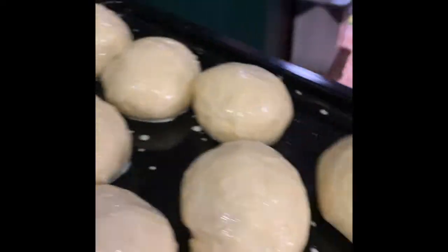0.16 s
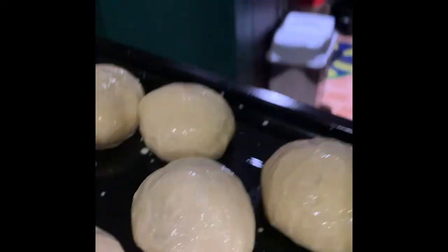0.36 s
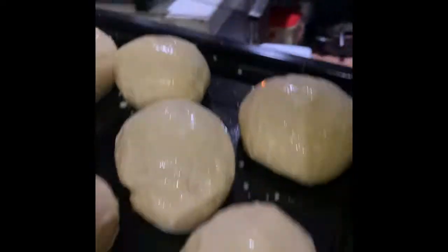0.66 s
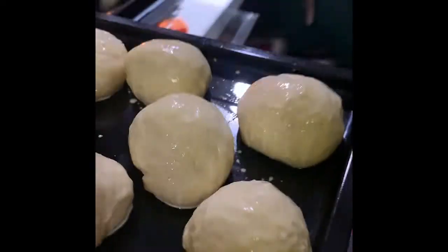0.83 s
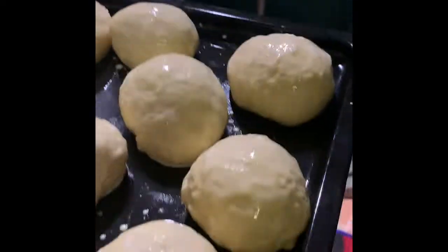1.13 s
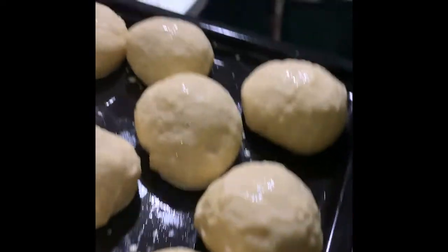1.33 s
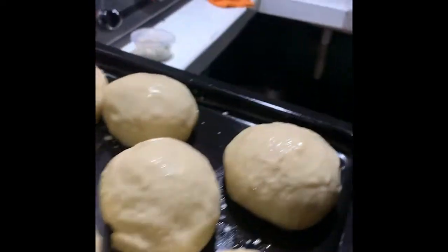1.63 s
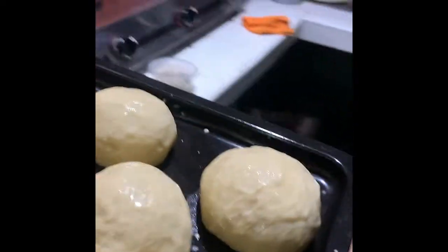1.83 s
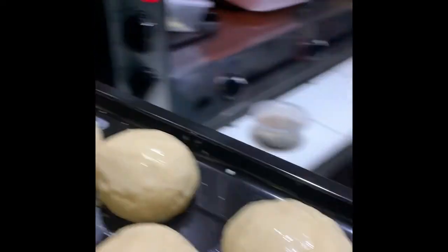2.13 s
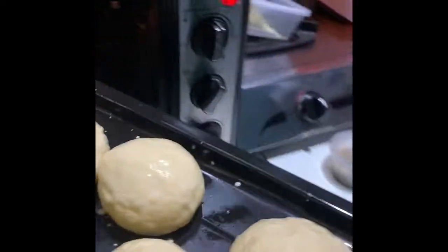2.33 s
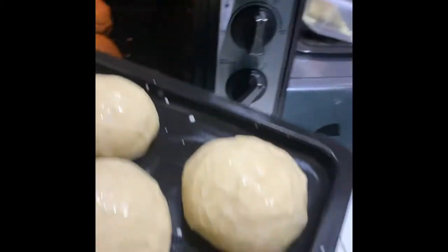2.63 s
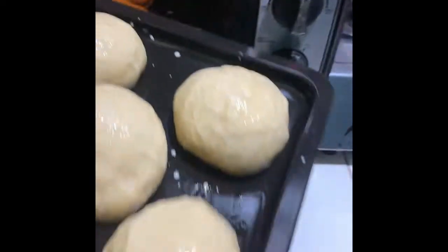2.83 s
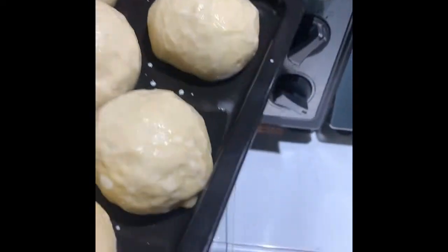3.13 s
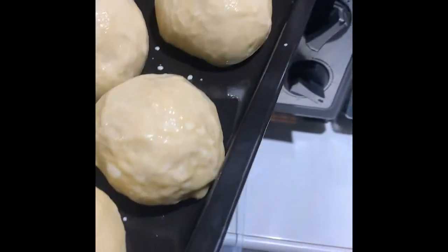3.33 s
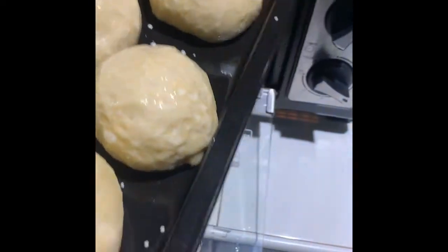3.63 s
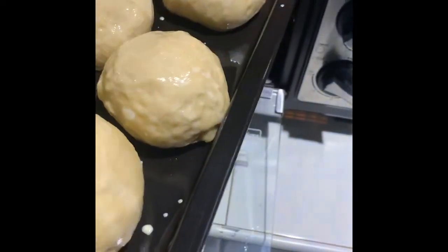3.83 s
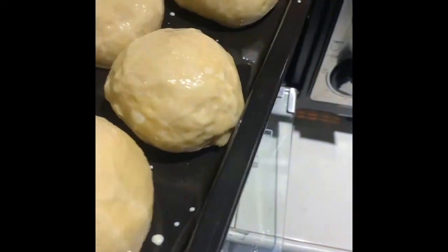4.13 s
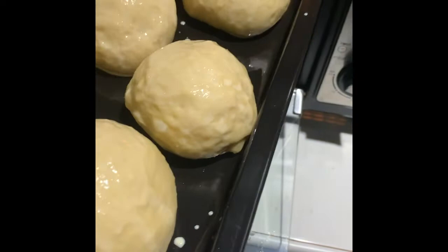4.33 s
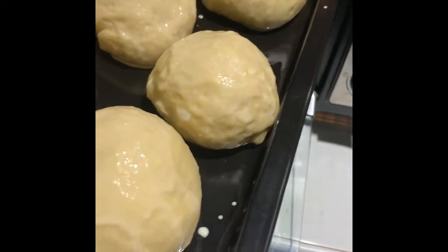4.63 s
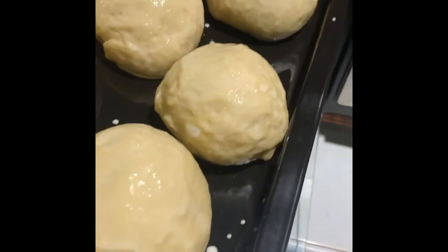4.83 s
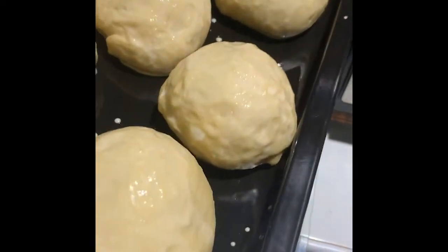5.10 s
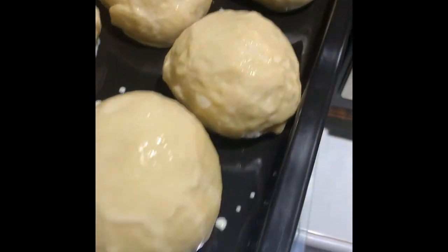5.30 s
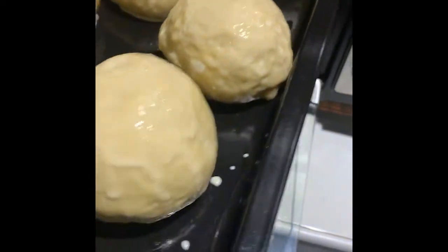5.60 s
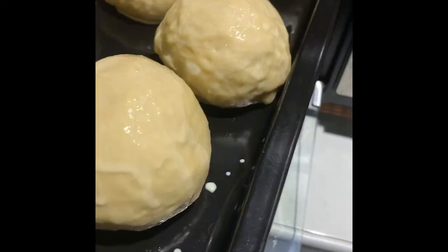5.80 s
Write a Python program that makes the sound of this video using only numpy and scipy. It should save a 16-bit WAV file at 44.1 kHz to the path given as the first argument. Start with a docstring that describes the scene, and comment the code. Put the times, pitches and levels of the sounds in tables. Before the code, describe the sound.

In a small home kitchen a fan drones low and airy throughout. Faint cloth and finger brushing comes first, with one tiny tick near one second. At about three seconds a loaded steel tray clanks hard on the oven rack, then harder still, followed by scattered knocks and a final rattling cluster. Close handheld stereo microphone, short room echo.

```python
"""A fan drones in a kitchen throughout: noise shaped by a spectrum and by housing resonances.
From t = 0.36 s to about 5 s, cloth and fingers brush as grainy bursts of filtered noise.
From t = 0.97 s a loaded steel tray knocks an oven's rack and walls: noise cracks, modal ringing, rattle, echo.
From 3.11 s low damped tones join; a soft noisy onset leads to the hardest blow at 3.73 s; knocks end at 5.73 s.
A stereo widener spreads all over two channels by phase and level shifts; a saturating stage rounds loud peaks."""
import sys
import numpy as np
from scipy import signal
from scipy.fft import rfft, irfft, next_fast_len
from scipy.io import wavfile
from scipy.ndimage import uniform_filter1d, map_coordinates

SR = 44100
rng = np.random.default_rng(int(sys.argv[2]) if len(sys.argv) > 2 else 0)


def bounce(signal):
    """Save signal as a 16-bit WAV file at the path given by the first command-line argument."""
    frames = np.transpose(np.atleast_2d(signal))
    limited = np.clip(frames, -1, 1)
    pcm = np.round(limited * 32767).astype(np.int16)
    wavfile.write(sys.argv[1], SR, pcm)


N = 262784

# Knocks of tray and oven, and at 3.7237 s a soft noisy onset just before the hardest blow:
# t/s, level/dB, boom, body and sizzle relative to the crack (each level/dB),
# low, middle and high favoured mode (each f/Hz), prominence of the upper two (level/dB)
KNOCK_ONSETS = [(0.9661, -28, -3, -12, 4.5, 356, 1650, 3640, 23),
                (2.9696, -32, -7, -17, -10, 331, 1260, 2850, 6),
                (3.1008, 2, -18, -4, -4.5, 427.4, 1002, 2190, 3.7),
                (3.1450, -17.5, -25, 2, -19, 520, 1300, 1620, 10),
                (3.335, -32.5, 5, 10.5, -28, 472, 930, 2010, 11),
                (3.5452, -27, -9, 2.5, -3, 423, 2075, 3380, 20),
                (3.551, -29, -20, -2, -4, 436, 2100, 3300, 14),
                (3.5693, -20, -20, -1, -2.5, 453.5, 2070, 6300, 6.1),
                (3.5765, -25, -17, -5, -3, 447, 2010, 6820, 10),
                (3.583, -30, -20, -1, -12, 457, 2000, 6700, 10),
                (3.7237, -13.5, -22, -10, -24, 382, 2200, 3370, 7.9),
                (3.73, 7.5, -23, -6.5, -6, 383.3, 918, 2236, 9.9),
                (3.775, -10.5, -28, 3, -20, 390, 1510, 2840, 9.2),
                (3.8784, -17, -28, 1.5, -48, 402.6, 1883, 2620, 21),
                (4.0695, -31, 8, -30, -4, 509, 1220, 2830, 4.8),
                (4.345, -29.5, -3, -6, -7.5, 330, 1080, 2800, 5.9),
                (4.6248, -32, -15, -15, -7, 484, 902, 2800, 8),
                (4.8612, -10.5, -24, 0, -18, 371.7, 794, 2420, 13),
                (5.181, -29, 7, -24, -9, 470, 1340, 2850, 8),
                (5.242, -9, -18, -6.5, -19.5, 358.5, 1105, 2830, 7.7),
                (5.257, -21, -5, 1, -31, 303, 1120, 1600, 10),
                (5.288, -27.5, -10, 9.5, -30, 400, 997, 1310, 8),
                (5.4475, -4, -42, -18.5, -25, 460, 736, 1905, 9.9),
                (5.458, -23, 3.5, 11.5, -31, 367.6, 1115, 3630, 12.4),
                (5.6125, -12, -23, 0, -29, 456, 1840, 3550, 3.3),
                (5.6235, -12, -14, 1, -32, 369, 1048, 3050, 17),
                (5.635, -22.5, -8, 6, -19, 415, 950, 1890, 13),
                (5.664, -26, -10, 10.5, -30, 401, 1000, 1800, 8),
                (5.7332, -27.5, 6, -4, -7, 412, 970, 2830, 6.2)]
# Centres of boom, panel, body, clank, sizzle and crack: f/Hz
COLOUR_CENTRES = [90, 190, 410, 1100, 11000, 3500]
# Modes of tray and oven shell: f/Hz, level/dB, decay by 60 dB t/s
STEEL_MODES = [(63, -7, 0.2), (86.36, 4, 2), (94.2, -6, 1.4), (151, 4, 0.55), (186.3, 7, 0.25),
               (248, -8.5, 0.26), (288, -9.5, 0.22), (366.1, -3, 0.43), (394.3, -2, 0.33),
               (424.6, -2.5, 0.32), (448.6, 4, 0.18), (504, 1.5, 0.36), (578.5, -4.5, 0.3),
               (756.4, 4, 0.13), (935, -3.5, 0.19), (995, 2.5, 0.17), (1107, 4.5, 0.14), (1310, 2, 0.1),
               (1502, 0, 0.13), (1629, -3.5, 0.074), (1814, -1, 0.067), (2020, -2, 0.086),
               (2300, 0.5, 0.043), (2852, -8.5, 0.11), (3230, -11, 0.045), (3500, -17, 0.019),
               (4150, -10, 0.072), (5560, -9.5, 0.059), (6160, -17, 0.078), (6720, -6.5, 0.075),
               (8140, -9, 0.07)]
# Spectrum of the loose rack: f/Hz, level/dB
RATTLE_SPECTRUM = [(60, 3), (200, 9.5), (500, -0.5), (1200, 1.5), (3000, -11), (5000, -5), (7000, -11.5),
                   (10000, -9.5), (13000, -18), (16000, -21)]
# Decay of the loose rack by 60 dB: f/Hz, t/s
RATTLE_DECAY = [(100, 0.26), (500, 0.47), (1500, 0.28), (5000, 0.16), (14000, 0.17)]
# Reverberation of the kitchen, decay by 60 dB: f/Hz, t/s
KITCHEN_DECAY = [(100, 0.16), (600, 0.72), (2000, 0.45), (6000, 0.34), (14000, 0.31)]
# Low damped tones, booms and body tones sounding with or just after knocks: t/s, level/dB, f/Hz,
# cycles of decay to 1/e, cycles of swell (time constant)
LOW_TONES = [(3.11, -7, 86.5, 26, 1.4), (3.178, 6.5, 423, 4.6, 3), (3.744, 2, 60.5, 1.6, 1),
             (3.795, -7, 190.3, 6.1, 1.2), (3.844, -7.5, 402, 12, 2), (4.873, -2.5, 182, 1.8, 1.1),
             (5.469, -7, 166, 1.3, 1), (5.49, -13.5, 368, 33, 2.3), (5.641, -3.5, 228, 2.5, 0.91)]
# Brushes of cloth and fingers: peak t/s, level/dB, length between 1/e points t/s
BRUSH_STROKES = [(0.36, -44, 0.21), (0.95, -44.5, 0.37), (0.996, -41, 0.046), (1.262, -44, 0.04),
                 (1.324, -40.5, 0.064), (1.426, -43.5, 0.14), (1.594, -46, 0.048), (1.784, -44, 0.058),
                 (1.896, -42, 0.12), (2.133, -45, 0.063), (2.35, -43.5, 0.17), (2.524, -45, 0.16),
                 (2.71, -46.5, 0.097), (3.546, -42, 0.082), (4.342, -48, 0.058), (4.503, -49, 0.087),
                 (4.686, -52, 0.23), (4.907, -39, 0.09)]
# Spectrum of rubbed cloth: f/Hz, level/dB
CLOTH_SPECTRUM = [(1500, -38), (3000, 6.5), (5000, 9), (7000, 1.5), (9000, -2), (12000, -4.5), (16000, -10)]
# Course of the fan's air stream: t/s, level/dB
AIR_COURSE = [(0, -35), (.5, -34), (1.5, -33.5), (2.2, -32), (3.3, -32), (3.8, -32), (4.3, -33), (5.4, -32),
              (5.96, -32.5)]
# Spectrum of the fan's rumble: f/Hz, level/dB
RUMBLE_SPECTRUM = [(15, -34), (25, -30), (40, -11.5), (52, 2), (60, -2), (70, -0.5), (90, -36)]
# Spectrum of the fan's drone: f/Hz, level/dB
DRONE_SPECTRUM = [(40, -46), (60, -19), (75, -2.5), (98, -3), (140, 0), (220, -1.5), (320, -4.5), (450, -6),
                  (600, -12.5), (900, -25), (1500, -85)]
# Resonances of the fan's housing: f/Hz, width f/Hz, level/dB
HOUSING_MODES = [(99.45, 3.6, 1.5), (114.1, 6.8, -6.5), (211, 16, -12.5), (469, 29, -15)]
# Spectrum of the air stream: f/Hz, level/dB
AIR_SPECTRUM = [(300, -17), (600, 2), (1000, 0), (1600, -5.5), (2500, -10), (4000, -14.5), (6000, -20.5),
                (9000, -37.5), (16000, -39)]
# Likeness of the two channels: f/Hz, cosine of twice the mixing angle (no unit)
CHANNEL_LIKENESS = [(30, 1), (300, 1), (520, 0.9), (800, 0.26), (2000, 0.46), (4000, 0.95), (8000, 1),
                    (15000, 1)]
# Phase by which the left channel leads: f/Hz, phase/rad
CHANNEL_LEAD = [(0, 0), (200, -.15), (500, -.45), (700, -1.2), (1000, -.3), (2400, 1.3), (3600, 1.6),
                (4700, 3.14), (8900, 9.42), (13150, 15.7), (16000, 19.8)]
# Left minus right channel: f/Hz, level/dB
CHANNEL_LEVEL = [(500, -0.5), (900, -2), (2000, -1.5), (3000, 0.5), (8000, 0), (15000, 0.5)]

KNOCK_SAMPLES = SR * 6 // 10  # span of each knock, low tone and reverberant tail
PANEL_DB, CLANK_DB = -2, -7.5  # panel relative to body, clank relative to crack
CLANK_FOLLOWS = 0.37  # share of the body's level/dB added to the clank
LOW_FAVOUR_DB, FAVOUR_WIDTH = 8, 0.0506  # prominence of the low mode; reach as a share of pitch
CRACK_RISE_S, CRACK_T60_S = 0.00059, 0.031  # the edge of the tray rolls onto the bar
TONE_WAVER_DB, TONE_WAVER_PER_S = 1.8, 30
RISE_SHARE = 0.49  # part of a brush spent rising
HANDLING_DB, CLOTH_PATCHY_DB = -55, 2  # faint steady rub of the grip; patchiness of the hiss
DRONE_DB, HUM_DB = 7.5, 4  # relative to the mean air stream
DRONE_GROWS, HUM_GROWS = 2, 2.8  # how many times wider than the air each swings, in dB
RUMBLE_DB = -32.5
RUMBLE_SWAY_DB, DRONE_SWAY_DB, AIR_SWAY_DB = 1.5, 1.2, 1.0  # slow random sway of each layer
TOP_HZ = 15800  # band limit


def amp(db):
    """Amplitude ratio of a level in decibels."""
    return 10 ** (np.asarray(db) / 20)


def unit(x):
    """Normalisation to an rms of 1."""
    return x / np.sqrt(np.mean(x ** 2) + 1e-20)


def along(points, hz):
    """Interpolation of (f/Hz, value) points on a logarithmic frequency axis."""
    f, v = np.transpose(points)
    return np.interp(np.log(hz + 1), np.log(f + 1), v)


def spectrum(points):
    """Amplitude response given by (f/Hz, level/dB) points."""
    return lambda hz: amp(along(points, hz))


def wobble(rate):
    """Random modulation: a smooth curve through `rate` random knots a second."""
    knots = rng.standard_normal(int(N * rate / SR) + 4)
    return map_coordinates(knots, [np.arange(N) * rate / SR])


def filtered(x, response):
    """Linear filtering: the spectrum times a complex frequency response."""
    n = x.shape[-1]
    m = next_fast_len(n + 8192)
    return irfft(rfft(x, m) * response(np.fft.rfftfreq(m, 1 / SR)), m)[..., :n]


def rush(gain, patchy_db):
    """Turbulent noise: two unrelated noises, jointly of rms 1, share random patches of gain."""
    z = signal.stft(rng.standard_normal((2, N)), nperseg=512)[2]
    field = uniform_filter1d(rng.standard_normal(z.shape[1:]), size=6, axis=0)
    field = uniform_filter1d(field, size=10, axis=1)
    noise = signal.istft(z * amp(patchy_db * unit(field)), nperseg=512)[1][:, :N]
    return unit(filtered(noise, gain))


def dying(t60s, gain, onset_s):
    """Frequency-dependent damping: two noises start at once and each band decays at its own rate."""
    hz, t, z = signal.stft(rng.standard_normal((2, KNOCK_SAMPLES)), SR, nperseg=512)
    z = z * amp(-60 * t / along(t60s, hz)[:, None]) * gain(hz)[:, None]
    noise = signal.istft(z, SR, nperseg=512)[1][:, :KNOCK_SAMPLES]
    return noise * (1 - np.exp(-np.arange(KNOCK_SAMPLES) / SR / onset_s))


def steel_ring(t, pitch, mode_db):
    """Modal superposition: damped sines whose random phase walk blurs the pitch like loose parts."""
    hz, _, t60 = (column[:, None] for column in np.transpose(STEEL_MODES))
    swell = 1 - np.exp(-(t * hz / 1.4) ** 2)  # a panel needs a few cycles to take up the blow
    fade = np.exp(-np.log(1000) * t / t60)
    walk = np.cumsum(rng.standard_normal((len(hz), KNOCK_SAMPLES // 4)), axis=1)
    buzz = np.repeat(walk, repeats=4, axis=1) * np.sqrt(35 * (hz / 1000) ** 0.75 / SR)
    modes = amp(mode_db) * swell * fade * np.sin(2 * np.pi * pitch * t + buzz)
    return amp(-8.5) * np.sum(modes, axis=0)


def impact_crack(t, colour, pitch, lean_db):
    """Impulsive excitation: a brief noise above 800 Hz, lifted near the steel modes."""
    def response(f):
        near_mode = np.exp(-((f / pitch - 1) / 0.038) ** 2)
        lean = 1 + 5 * np.sum(amp(lean_db) * near_mode, axis=0)
        return amp(along(colour, f)) * (f > 800) * lean
    hard = filtered(rng.standard_normal(SR // 16), response)
    envelope = amp(1.5 - 60 * t / CRACK_T60_S) * (1 - np.exp(-t / CRACK_RISE_S))
    return envelope * np.pad(hard, (0, KNOCK_SAMPLES - len(hard)))


def rack_rattle(colour):
    """Intermittent contact: decaying noise in random steps of level as bars touch and part."""
    steps = rng.standard_normal(KNOCK_SAMPLES // 90 + 1)
    chatter = amp(3 * np.repeat(steps, repeats=90)[:KNOCK_SAMPLES])
    gain = lambda f: amp(along(RATTLE_SPECTRUM, f) + along(colour, f))
    return amp(5.0) * uniform_filter1d(chatter, size=40) * dying(RATTLE_DECAY, gain, onset_s=0.001)


def knocks():
    """Impact response: each onset cracks, rings, rattles and excites the kitchen's reverberation."""
    out = np.zeros((2, N + 2 * KNOCK_SAMPLES))
    t = np.arange(KNOCK_SAMPLES) / SR
    hz, level_db, _ = (column[:, None] for column in np.transpose(STEEL_MODES))
    tails = [dying(KITCHEN_DECAY, np.ones_like, onset_s=0.0087) for _ in range(6)]
    for k, (s, db, boom_db, body_db, sizzle_db, *favoured_hz, favour_db) in enumerate(KNOCK_ONSETS):
        clank_db = CLANK_DB + CLANK_FOLLOWS * body_db
        band_db = [boom_db, body_db + PANEL_DB, body_db, clank_db, sizzle_db, 0]
        colour = sorted(zip(COLOUR_CENTRES, band_db))
        # the struck place lifts nearby modes; grip and load bend them to its pitches
        apart = np.log(np.array([favoured_hz]) / hz)
        reach = np.exp(-(apart / FAVOUR_WIDTH) ** 2)
        spot_db = reach @ [[LOW_FAVOUR_DB], [favour_db], [favour_db]]
        level_chance, pitch_chance = rng.standard_normal((2, len(STEEL_MODES), 1))
        bend = np.sum(reach * apart, axis=1, keepdims=True)
        pitch = hz * (1 + 0.0116 * pitch_chance + bend)
        lean_db = level_db + spot_db
        ring = steel_ring(t, pitch, lean_db + along(colour, hz) + 1.74 * level_chance)
        crack = impact_crack(t, colour, pitch, lean_db)
        near = rack_rattle(colour) + (ring + crack) * [[1], [0]]  # ring and crack: common signal only
        tail = tails[k % len(tails)]
        room = signal.fftconvolve(near[:1], tail / np.linalg.norm(tail[0]), axes=1)
        start = round(s * SR)
        out[:, start:start + KNOCK_SAMPLES] += amp(db) * near
        out[:, start:start + 2 * KNOCK_SAMPLES - 1] += amp(db - 14.5) * room
    return out[:, :N]


def low_tones():
    """Damped oscillation: a low tone swells and decays, with a wavering level."""
    out = np.zeros((2, N + KNOCK_SAMPLES))
    t = np.arange(KNOCK_SAMPLES) / SR
    for s, db, hz, cycles, swell_cycles in LOW_TONES:
        envelope = np.exp(-t * hz / cycles) * (1 - np.exp(-t * hz / swell_cycles))
        start = round(s * SR)
        out[0, start:start + KNOCK_SAMPLES] -= amp(db) * np.sin(2 * np.pi * hz * t) * envelope
    return out[:, :N] * amp(TONE_WAVER_DB * wobble(TONE_WAVER_PER_S))


def rustle():
    """Friction noise: a grainy hiss of cloth and fingers under bell-shaped strokes and a steady rub."""
    t = np.arange(N) / SR
    strokes = np.zeros(N)
    for s, db, length in BRUSH_STROKES:
        side = length * np.where(t < s, RISE_SHARE, 1 - RISE_SHARE)
        strokes += amp(db) * np.exp(-((t - s) / side) ** 2)
    rub = amp(HANDLING_DB + 2.8 * wobble(6.3))
    grain = amp(1.7 * wobble(300) + 0.92 * wobble(24.96))
    return (strokes + rub) * unit(grain * rush(spectrum(CLOTH_SPECTRUM), CLOTH_PATCHY_DB))


def housing(f):
    """Forced resonance: a sum of band-pass responses of the fan's housing."""
    return sum(amp(db) * 1j * f * w / (c * c - f * f + 1j * f * w) for c, w, db in HOUSING_MODES)


def fan():
    """Flow noise and resonance: air, drone and hum swell as the microphone comes nearer; rumble does not."""
    air_db = np.interp(np.arange(N) / SR, *np.transpose(AIR_COURSE))
    mean_db = air_db.mean()
    swing_db = air_db - mean_db
    drone_gain = spectrum(DRONE_SPECTRUM)
    rumble = rush(lambda hz: amp(along(RUMBLE_SPECTRUM, hz)) * (hz < 90), patchy_db=0.5)
    hum = rush(lambda hz: drone_gain(hz) * housing(hz), patchy_db=0.0)
    drone = rush(drone_gain, patchy_db=1.5)
    air = rush(spectrum(AIR_SPECTRUM), patchy_db=1.62)
    rumble_level = amp(RUMBLE_DB + RUMBLE_SWAY_DB * wobble(3.06))
    hum_level = amp(mean_db + HUM_DB + HUM_GROWS * swing_db)
    drone_level = amp(mean_db + DRONE_DB + DRONE_GROWS * swing_db + DRONE_SWAY_DB * wobble(6.085))
    air_level = amp(air_db + AIR_SWAY_DB * wobble(8))
    return rumble_level * rumble + hum_level * hum + drone_level * drone + air_level * air


def scene():
    """Superposition and coherence: of each pair, the first signal is alike in both channels, the second opposed."""
    def share(hz):
        angle = np.arccos(np.clip(along(CHANNEL_LIKENESS, hz), -1, 1)) / 2
        return np.array([np.cos(angle), np.sin(angle)])
    same, opposed = filtered(knocks() + low_tones() + rustle() + fan(), share)
    return np.array([same + opposed, same - opposed])


def record(dry):
    """Stereo widening and saturation: phase and level differ by channel, peaks round off, the band ends."""
    half = np.array([[.5], [-.5]])  # each channel takes half the difference
    def channel_response(hz):
        lead = np.interp(hz, *np.transpose(CHANNEL_LEAD))
        return amp(half * along(CHANNEL_LEVEL, hz)) * np.exp(1j * half * lead)
    channels = filtered(dry, channel_response)
    clipped = channels / (1 + np.abs(channels / .99) ** 8) ** (1 / 8)
    return np.clip(filtered(clipped, lambda hz: hz < TOP_HZ), -1, 1)


dry = scene()
out = record(dry)
bounce(out)
```